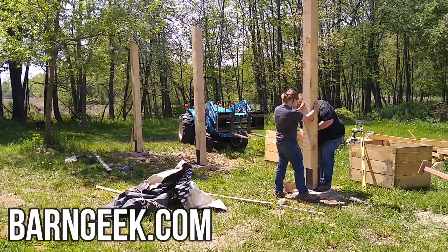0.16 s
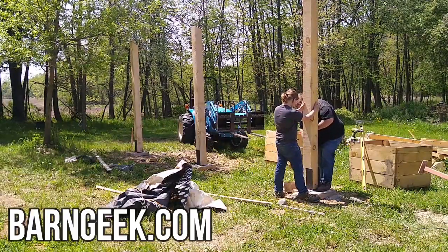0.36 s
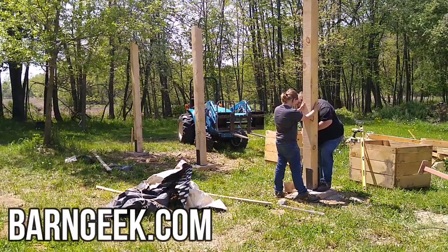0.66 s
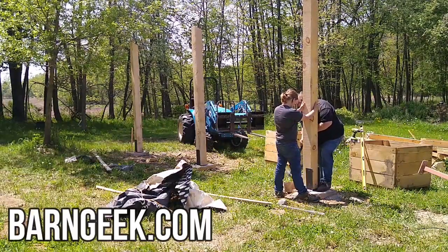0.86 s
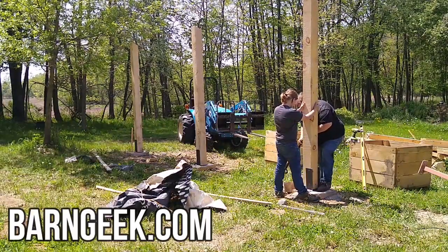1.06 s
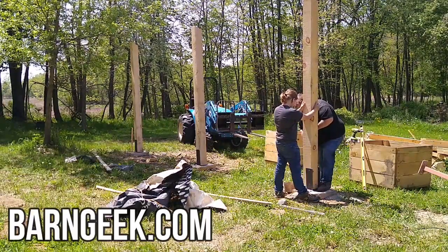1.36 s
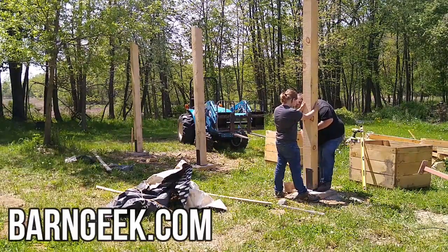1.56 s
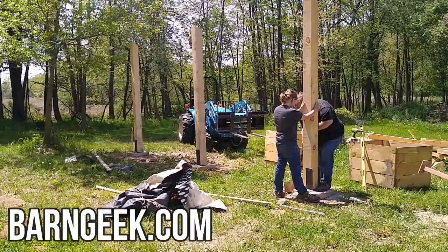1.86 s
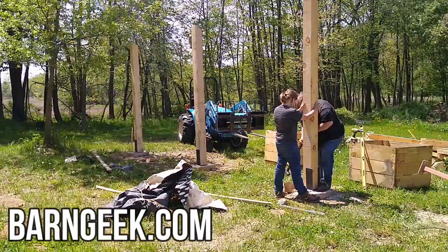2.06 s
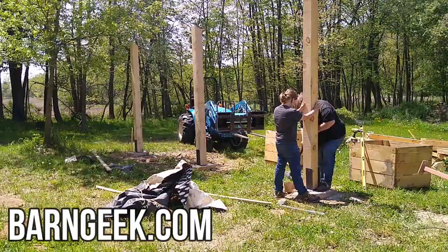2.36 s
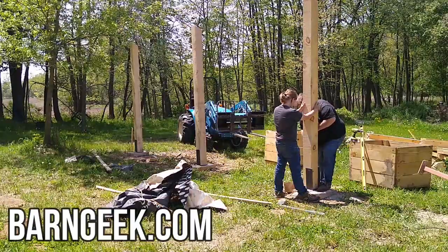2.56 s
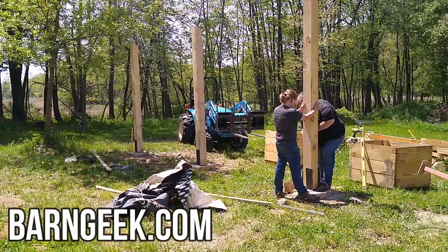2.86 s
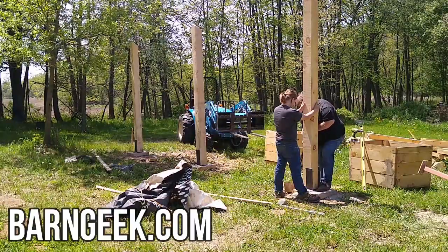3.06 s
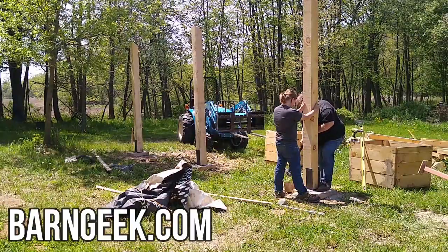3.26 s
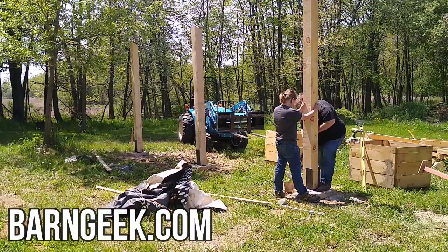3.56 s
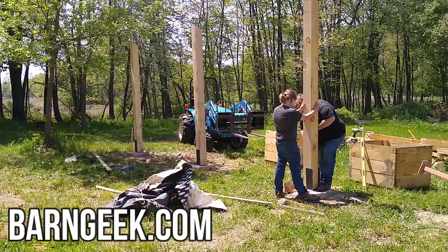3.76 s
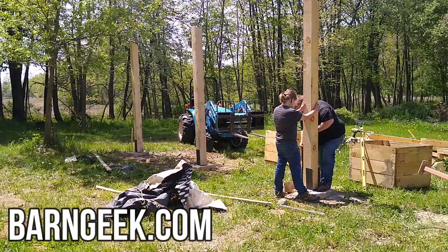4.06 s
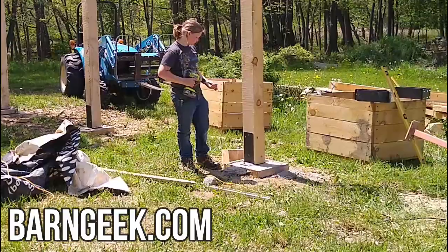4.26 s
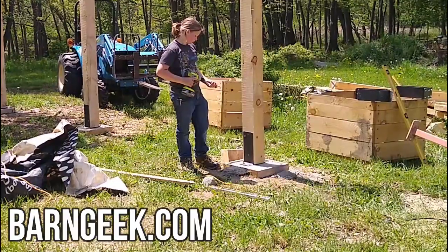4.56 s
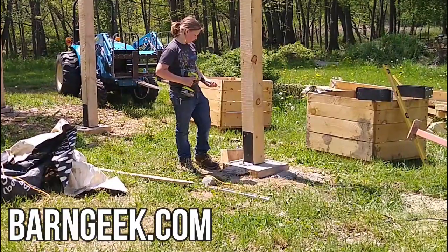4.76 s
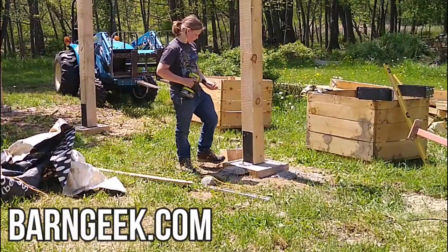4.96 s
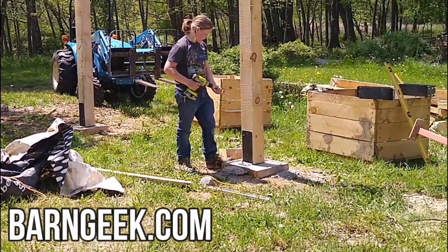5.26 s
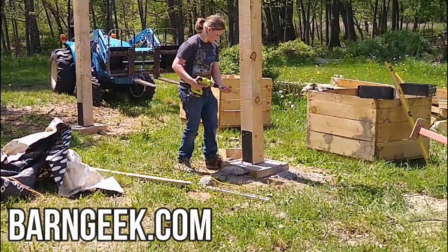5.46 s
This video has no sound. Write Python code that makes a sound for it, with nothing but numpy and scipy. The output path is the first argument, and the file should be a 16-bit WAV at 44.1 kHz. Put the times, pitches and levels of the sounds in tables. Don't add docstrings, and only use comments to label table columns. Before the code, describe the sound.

An open clearing edged by trees, heard in stereo with low wind rumble on the microphone and soft leaf hiss. A steel hammer strikes a standing timber post at about 0.4, 1.6, 2.7 and 3.9 seconds. Each blow is loud and abrupt: a hollow low-mid knock, a woody clack, crushed-fibre crackle and a thin, brief metallic edge, followed by a short diffuse echo from the trees. The first two are brighter, the last duller. A gust swells near 1.2 seconds, and a faint bird call comes at about 2.2 and 2.5. At 4.2 seconds the scene cuts abruptly, ending the echo, to a quieter, sheltered place with less rumble. Songbirds repeat quick rising chirps and sharp downward whistles, growing clearer towards the end, with fainter chips behind. A soft scuff comes near 4.7, a light gust just after 5, and tiny tool clicks from about 5.3 until the end at around 5.6.

```python
import sys
import numpy as np
from scipy import signal
from scipy.fft import rfft, irfft, next_fast_len
from scipy.io import wavfile
from scipy.ndimage import uniform_filter1d, map_coordinates

SR = 44100
rng = np.random.default_rng(int(sys.argv[2]) if len(sys.argv) > 2 else 0)


def master(y):
    cut = np.clip(np.atleast_2d(y).T, -1, 1)
    pcm = np.round(cut * 32767)
    wavfile.write(sys.argv[1], SR, pcm.astype(np.int16))


def elevation(decibels):
    levels = np.asarray(decibels, float)
    return 10 ** (levels / 20)


N = 248283
CHANGE_S = 4.205

# frequency in Hz, level in dB per Hz.
RUMBLE_SPECTRUM = [(20, -53), (32, -23.5), (42, -2), (53, 2), (70, -3), (100, -11), (150, -24),
                   (300, -38.5), (500, -120)]
GUST_SPECTRUM = [(59, -28.5), (100, -8.5), (173, -11), (309, -11.5), (600, -11), (1300, -25), (1690, -58),
                 (2860, -120)]
FAR_LEAVES_SPECTRUM = [(530, -16), (900, -6), (3000, -19), (3970, -21.5), (4880, -22.5), (5620, -26.5),
                       (8500, -34.5), (11000, -60.5), (18700, -120)]
NEAR_LEAVES_SPECTRUM = [(530, -15), (900, 0), (1500, -4.5), (2160, -2), (3280, -4.5), (6280, -8.5),
                        (9500, -31), (12400, -51), (20900, -120)]
HISS_SPECTRUM = [(4100, -30.5), (7000, -18.5), (7600, -4), (9000, 1), (14700, 4), (15600, 0),
                 (15900, -42.5)]
# frequency in Hz, correlation from -1 to 1.
LEFT_RIGHT_LIKENESS = [(60, 0.3), (150, 0.67), (380, 0.89), (950, -0.38), (2380, 0.27), (5980, -0.4),
                       (15000, 0.65)]
# time in seconds, strength in dB.
WIND_STRENGTH = [
    [(0, 4.5), (.2, 1.5), (.5, -5.5), (.85, 1.5), (1.02, 4), (1.19, 10), (1.3, -3), (2, 2.5), (2.5, -1.5),
     (3.2, -1.5), (4.2, -7.5)],
    [(4.206, -2), (4.4, 1.5), (4.95, -2), (5.05, 8), (5.15, 3.5), (5.3, -2.5), (5.63, -5)],
]
# rumble, gust body, leaves and top hiss, all in dB.
CALM_LEVELS = [
    (-57, -67.5, -68.5, -84.5),
    (-68.5, -76.5, -77.5, -85),
]
LAYER_GROWTH = (1, 0.25, .3, .3)

# start in seconds, length in seconds, centre in Hz, level in dB.
SCUFFS = [(0.164, 0.04, 172, -59), (1.195, 0.035, 141, -48.5), (1.991, 0.025, 160, -57),
          (5.2, 0.0025, 9000, -85), (4.25, 0.49, 13000, -84), (4.552, 0.014, 7000, -77),
          (4.58, 0.032, 7340, -77), (4.695, 0.057, 3800, -74), (4.698, 0.083, 600, -66),
          (4.7, 0.075, 123, -61.5), (4.701, 0.028, 11000, -72.5), (5.262, 0.0077, 7350, -72),
          (5.266, 0.017, 2744, -72), (5.345, .005, 11900, -77), (5.372, .005, 12000, -78),
          (5.45, .006, 11900, -81), (5.5, 0.0065, 12100, -77.5)]

# time after the start in seconds, frequency in Hz, level in dB (the upbeat keeps an even
RISE_SHAPE = [(0, 1627, 5), (.01, 1711, -0.5), (.04, 2140, 5), (.052, 2490, 7.5), (.062, 2900, 7.5),
              (.07, 3300, -30)]
FALL_SHAPE = [(0, 8340, -10), (.008, 7300, 2), (.02, 5980, 8), (.03, 5500, -2.5), (.045, 5290, -5)]
DROP_SHAPE = [(0, 4730, -2), (.01, 4186, -0.5), (.022, 3770, 3), (.036, 3400, -7)]
UPBEAT_SHAPE = [(0, 5770, 0.0038), (.012, 7740, 0)]
SWEEP_SHAPE = [(0, 5650, 0), (.03, 3930, 0)]
CHIP_SHAPE = [(0, 4680, 0), (.017, 4370, 0)]
# start in seconds, level in dB, tempo factor, pitch factor.
RISES = [(4.412, -81, 1.01, 0.97), (4.601, -80.5, 1.01, 1), (4.761, -79, 0.97, 1),
         (4.917, -78.5, 1.05, 0.98), (5.08, -79, 1.07, .99), (5.24, -78, 1.01, .99),
         (5.388, -78, 1.03, .99), (5.539, -79, 1.06, 0.97)]
FALLS = [(4.43, -80, 1.1, 1), (4.612, -77.5, 1.1, 0.98), (4.808, -79.5, 1.1, 0.97),
         (4.992, -74, 0.93, 1.004), (5.167, -75, .95, .99), (5.343, -75, 1.18, 0.97),
         (5.518, -73, 1.3, 0.96)]
DROPS = [(4.491, -80, 0.65, .98), (4.675, -77.5, 1.04, 0.99), (4.863, -80, 0.71, 1),
         (5.045, -75.5, 0.99, 1), (5.219, -76, 0.76, .99), (5.395, -76.5, 1.1, 1.01),
         (5.571, -74.5, 1.07, 0.98)]
SWEEPS = [(4.256, -81, .97, 0.97), (4.26, -83, .7, 1.33), (4.369, -81, 1.17, 0.95), (4.586, -80.5, 1, 1),
          (4.815, -80, .8, 0.94)]
# start in seconds, level in dB.
CHIPS = [(4.356, -93), (4.392, -86), (4.428, -80), (4.876, -80.5), (4.908, -82), (5.614, -80)]
# start in seconds, length in seconds, from Hz, to Hz, level in dB.
CHIRPS = [(0.726, 0.012, 4420, 4380, -78), (4.197, 0.043, 2247, 2143, -75), (4.255, 0.03, 2210, 2140, -84),
          (4.477, 0.012, 5540, 4730, -78), (5.037, 0.049, 3050, 2910, -91), (5.156, .0217, 2890, 2480, -86),
          (5.192, .05, 2250, 2300, -91), (5.297, 0.012, 2900, 3840, -77), (5.34, 0.044, 3040, 2940, -86)]
# time after the start in seconds, length in seconds, from Hz, to Hz, level in dB.
CALL_NOTES = [
    (0, .027, 5470, 5380, -1),
    (.023, 0.012, 4820, 4000, -1),
    (.087, .022, 4050, 4800, -1),
    (.093, .016, 5010, 5150, 0.5),
]
# start in seconds, level in dB.
CALLS = [(2.166, -82), (2.524, -80)]
# delay in seconds, level in dB.
PERCH_ECHOES = [
    (.004, -5),
    (.016, -15),
]

BLOW_TIMES = [
    .4148,
    1.566,
    2.6997,
    3.8793,
]
# peak in dB, then thud, knock, clack and steel in dB relative to the peak.
BLOWS = [
    (-7.5, -6.5, -8.5, -10.5, -24),
    (-8, -5.5, -9.5, -8, -20.5),
    (-6, -9, -9.5, -9.5, -22.5),
    (-6, -8.5, -12, -11.5, -22.5),
]
# frequency in Hz, t60 in seconds, level in dB for blows one to four.
BENDING_MODES = [(128, .17, -1, -1, -1, -2), (200, .075, 0, 0, 0, 0), (248, .16, 2, 2, 0, -7),
                 (263, .16, -14, -12, -10, -5), (318, .2, -14, -16, -22, -16), (389, .16, -9, -9, -5, -3),
                 (462, .13, -12, -12, -9, -13), (533, .12, -5, -2, -3, -3), (600, .12, -13, -12, -12, -13),
                 (700, .15, -12, -12, -13, -13), (737, .13, -14, -11, -14, -1),
                 (835, .16, -10, -12, -18, -16)]
# frequency in Hz, t60 in seconds, level in dB for blows one to four.
UPPER_MODES = [(960, .12, -16, -18, -18, -20), (1040, .11, -11, -15, -16, -15),
               (1165, .11, -19, -19, -20, -22), (1330, .12, -19, -17, -20, -22),
               (1430, .1, -20, -18, -22, -24), (1560, .14, -23, -23, -25, -19),
               (1660, .12, -23, -23, -23, -16), (1760, .12, -23, -22, -25, -22),
               (2000, .1, -28, -26, -27, -24), (2165, .3, -28, -32, -36, -26),
               (2390, .14, -31, -31, -33, -32), (2665, .085, -28, -27, -21, -21),
               (3280, .09, -27, -27, -25, -20), (3390, .17, -29, -29, -22, -30)]
# frequency in Hz, level in dB, t60 in seconds.
HEAD_MODES = [(4480, -15, .12), (5830, -3, .13), (6950, -10, .07), (9200, -10, .06), (10850, -12, .15),
              (11150, -11, .17), (11480, -9, .11), (12370, -1, .075), (13160, -5, .07), (14200, 2, .045)]
# frequency in Hz, level in dB per Hz.
FIBRE_SPECTRUM = [(35, -30), (60, -10.5), (566, 0.5), (1380, -19.5), (2470, -26.5), (2650, -27.5),
                  (3340, -27), (4970, -42), (5720, -36.5), (9790, -45), (12700, -32.5), (15000, -32),
                  (15900, -60.5)]
# frequency in Hz, t60 in seconds.
FIBRE_DECAY = [(100, 0.18), (500, 0.2), (2000, 0.12), (5000, 0.22), (12000, 0.043)]
# frequency in Hz, t60 in seconds.
TREE_DECAY = [(100, 0.35), (500, 0.53), (2000, 0.55), (5000, 0.63), (12000, 0.43)]


def unit(x):
    return x / np.sqrt(np.mean(x ** 2) + 1e-20)


def along(points, hz):
    f, v = np.transpose(points)
    return np.interp(np.log(hz + 1), np.log(f + 1), v)


def wobble(rate):
    knots = rng.standard_normal(int(N * rate / SR) + 4)
    return map_coordinates(knots, [np.arange(N) * rate / SR])


def filtered(x, response):
    m = next_fast_len(x.shape[-1] + 8192)
    spectrum = rfft(x, m) * response(np.fft.rfftfreq(m, 1 / SR))
    return irfft(spectrum, m)[..., :x.shape[-1]]


def spread(x, pan_db, lag_ms):
    side = np.array([[.5], [-.5]])
    return filtered(x, lambda hz: elevation(pan_db * side) * np.exp(-2j * np.pi * hz * side * lag_ms / 1000))


def dying(t60s, channels):
    hz, t, z = signal.stft(rng.standard_normal((channels, SR // 2)), SR, nperseg=128)
    z = z * elevation(-60 * t / along(t60s, hz)[:, None])
    return signal.istft(z, SR, nperseg=128)[1][:, :SR // 2]


def rush(spectrum, patchy_db):
    z = signal.stft(rng.standard_normal((2, N)), nperseg=512)[2]
    field = uniform_filter1d(rng.standard_normal(z.shape[1:]), size=6, axis=0)
    field = uniform_filter1d(field, size=10, axis=1)
    pair = signal.istft(z * elevation(patchy_db * unit(field)), nperseg=512)[1][:, :N]

    def mid_side_response(hz):
        angle = np.arccos(np.clip(along(LEFT_RIGHT_LIKENESS, hz), -1, 1)) / 2
        return elevation(along(spectrum, hz)) * [np.cos(angle), np.sin(angle)]

    mid, side = filtered(pair, mid_side_response)
    return unit(np.array([mid + side, mid - side]))


def breeze():
    t = np.arange(N) / SR
    strength_db = np.interp(t, *np.concatenate(WIND_STRENGTH).T)
    calm_db = np.array(CALM_LEVELS)[(t >= CHANGE_S).astype(int)].T
    rumble_db, gust_db, leaves_db, hiss_db = calm_db + np.outer(LAYER_GROWTH, strength_db)
    flutter = wobble(6.8)
    lumps = elevation(.8 * wobble(32))
    rumble = elevation(rumble_db + 2.0) * unit(lumps * rush(RUMBLE_SPECTRUM, patchy_db=-1.0))
    gust = elevation(gust_db + 0.41 * flutter) * rush(GUST_SPECTRUM, patchy_db=0.5)
    far_leaves = rush(FAR_LEAVES_SPECTRUM, patchy_db=.6)
    near_leaves = rush(NEAR_LEAVES_SPECTRUM, patchy_db=-0.5)
    foliage = np.where(np.arange(N) < CHANGE_S * SR, far_leaves, near_leaves)
    leaves = elevation(leaves_db + .6 * flutter) * foliage
    hiss = elevation(hiss_db + .6 * wobble(13)) * rush(HISS_SPECTRUM, patchy_db=1.3)
    return rumble + gust + leaves + hiss


def handling():
    out = np.zeros((2, N))
    grit_top_hz = 15700
    for s, length, hz, db in SCUFFS:
        u = np.arange(round(length * SR)) / (length * SR)
        grit = rng.standard_normal((2, SR // 2))
        grit = grit + 0.5 * grit[0]
        grit = filtered(grit, lambda f: np.exp(-(np.log2((f + 1) / hz) / 1.02) ** 2) * (f < grit_top_hz))
        puff = unit(grit[:, :len(u)]) * np.sin(np.pi * u ** 0.9)
        out[:, round(s * SR):][:, :len(u)] += elevation(db) * puff
    return out


def whistle(out, s, shape):
    at, hz, db = np.transpose(shape)
    t = np.arange(round(at[-1] * SR)) / SR
    flicker_db = 1.5 * map_coordinates(rng.standard_normal(40), [t * 220])
    phase = 2 * np.pi * np.cumsum(np.interp(t, at, hz)) / SR
    tone = elevation(np.interp(t, at, db) + flicker_db) * np.sin(phase)
    tone *= np.sqrt(2) * signal.windows.tukey(len(t), .2)
    return np.pad(tone, (round(s * SR), N))[:N] + out


def phrases(shape, rows):
    out = np.zeros(N)
    for s, db, tempo, pitch in rows:
        out = whistle(out, s, np.array(shape) * [tempo, pitch, 1] + [0, 0, db])
    return out


def perched(voice, pan_db, lag_ms, wet_db):
    started = np.arange(N)
    echoes = sum(elevation(db) * np.roll(voice, round(s * SR)) * (started > s * SR) for s, db in PERCH_ECHOES)
    voice = voice + echoes
    tail = dying([(2000, 1.0), (7000, .35)], channels=2)
    wet = signal.fftconvolve(voice[None], tail / np.linalg.norm(tail[0]), axes=1)[:, :N]
    return spread(voice, pan_db, lag_ms) + elevation(wet_db) * wet


def birds():
    far = phrases(SWEEP_SHAPE, SWEEPS) + phrases(CHIP_SHAPE, [(s, db, 1, 1) for s, db in CHIPS])
    notes = list(CHIRPS)
    for s, db in CALLS:
        notes += [(s + later, length, a, b, db + note_db) for later, length, a, b, note_db in CALL_NOTES]
    for s, length, from_hz, to_hz, db in notes:
        far = whistle(far, s, [(0, from_hz, db), (length, to_hz, db)])
    lead_s, flick_db, warm_up = .041, -9, 3
    flicks = [(s - lead_s, db + flick_db, 1, 1) for s, db, *_ in FALLS[warm_up:]]
    falling = phrases(UPBEAT_SHAPE, flicks) + phrases(FALL_SHAPE, FALLS) + phrases(DROP_SHAPE, DROPS)
    up = perched(phrases(RISE_SHAPE, RISES), pan_db=2.0, lag_ms=0.079, wet_db=-9.5)
    down = perched(falling, pan_db=5.0, lag_ms=-0.03, wet_db=-7.5)
    return up + down + perched(far, pan_db=0.5, lag_ms=0.031, wet_db=-10.0)


def ringing(hz, db, t60, t, blur, attack):
    hz, db, t60 = hz[:, None], db[:, None], np.clip(t60, .03, .3)[:, None]
    steps = rng.standard_normal((len(hz), len(t)))
    drift = blur * np.cumsum(steps, axis=1) * hz / np.sqrt(500 * SR)
    modes = elevation(db - 60 * t / t60) * np.sin(2 * np.pi * hz * t + drift)
    return -np.sum(modes, axis=0) * (1 - np.exp(-t / attack))


def post_ring(mode_db, after):
    hz, t60 = np.transpose(BENDING_MODES + UPPER_MODES)[:2]
    upper_lift_db = 3 * (np.arange(len(hz)) >= len(BENDING_MODES))
    return elevation(-13.0) * ringing(hz, mode_db + upper_lift_db, t60, after, blur=.04, attack=0.00045)


def head_ring(steel_db, after):
    hz, db, t60 = np.transpose(HEAD_MODES)
    bite_db = db + steel_db + 3 * rng.standard_normal(len(HEAD_MODES))
    return elevation(-7) * ringing(hz, bite_db, t60, after, blur=np.sqrt(.002), attack=.002)


def fibre_crush(tint, t):
    crush = filtered(dying(FIBRE_DECAY, channels=3), lambda hz: elevation(along(FIBRE_SPECTRUM, hz) + along(tint, hz)))
    return crush * elevation(9.5) * (1 - np.exp(-t / 0.00074))


def steel_tick(steel_db, t, after):
    tick = filtered(rng.standard_normal(len(t)), lambda hz: 1 / (1 + (8000 / (hz + 1)) ** 6))
    return tick * elevation(steel_db - 1 - 60 * t / 0.004) * (after > 0)


def ground_shudder(t):
    centre_hz, t60 = 62, 0.65
    noise = rng.standard_normal(len(t))
    noise = filtered(noise, lambda hz: np.exp(-(np.log2((hz + 1) / centre_hz) / 1.2) ** 2))
    return unit(noise) * elevation(-33 - 60 * t / t60) * (1 - np.exp(-t / .03))


def tree_echo(near, t):
    tail = dying(TREE_DECAY, channels=2) * (1 - np.exp(-t / 0.0022))
    dull = filtered(tail, lambda hz: 1 / (1 + (hz / 6000) ** 4))
    tail += dull * 0.5 * np.exp(-((t - .13) / 0.031) ** 4)
    return signal.fftconvolve(near[None], tail / np.linalg.norm(tail[0]), axes=1)[:, :len(t)]


def hammer():
    out, t = np.zeros((2, N + SR)), np.arange(SR // 2) / SR
    strengths = np.transpose(BENDING_MODES + UPPER_MODES)[2:]
    after = np.clip(t - .001, 0, 1)
    radiation = signal.butter(3, 99.9, "high", fs=SR, output="sos")
    scatter = [(200, -23.5), (1000, -26), (5000, -6.5), (10000, -8.5)]  # (Hz, dB)
    for s, (db, thud_db, knock_db, clack_db, steel_db), mode_db in zip(BLOW_TIMES, BLOWS, strengths):
        tint = [(200, thud_db), (550, knock_db), (1800, clack_db + 15), (10000, steel_db + 24)]
        wood = post_ring(mode_db, after)
        steel = head_ring(steel_db, after)
        crush = fibre_crush(tint, t)
        contact = elevation(clack_db + 2.5 - 60 * t / 0.0065) * np.sin(2 * np.pi * 1550 * t)
        near = contact + wood + steel + crush[0] + steel_tick(steel_db, t, after)
        near = signal.sosfilt(radiation, near)
        scattered = filtered(crush[1:], lambda hz: elevation(along(scatter, hz)))
        heard = spread(near, pan_db=-0.1, lag_ms=0.095) + ground_shudder(t) + scattered
        heard = heard + elevation(-17.0) * tree_echo(near, t)
        out[:, round(s * SR):][:, :len(t)] += elevation(db) * heard
    return out[:, :N]


def scene():
    first_spot = np.arange(N) < CHANGE_S * SR
    return breeze() + handling() + birds() + hammer() * first_spot


def top_cut(x):
    return signal.sosfilt(signal.butter(12, 16550, fs=SR, output="sos"), x)


def record(dry):
    thin = signal.sosfilt(signal.butter(4, 45, "high", fs=SR, output="sos"), dry)
    thin = filtered(thin, lambda hz: 1 / np.sqrt(1 + (hz / 16300) ** 80))
    soft = thin / (1 + np.abs(thin / .33) ** 3) ** (1 / 3)
    return top_cut(soft)


dry = scene()
out = record(dry)
master(out)
```